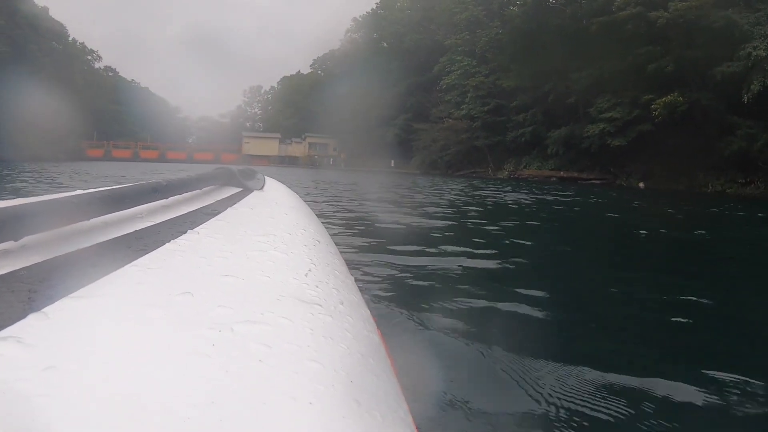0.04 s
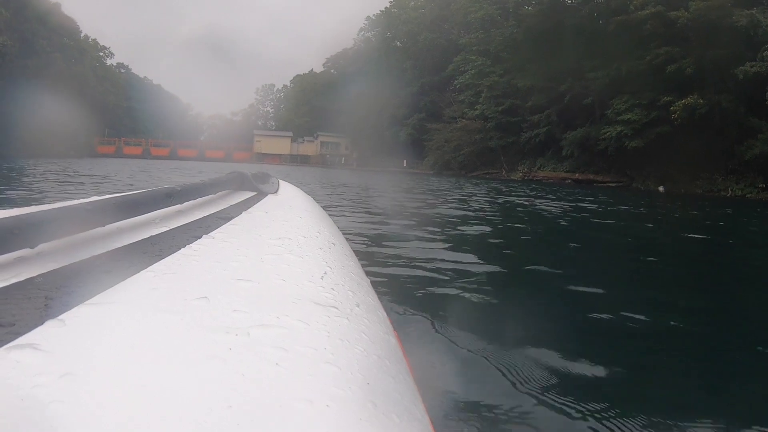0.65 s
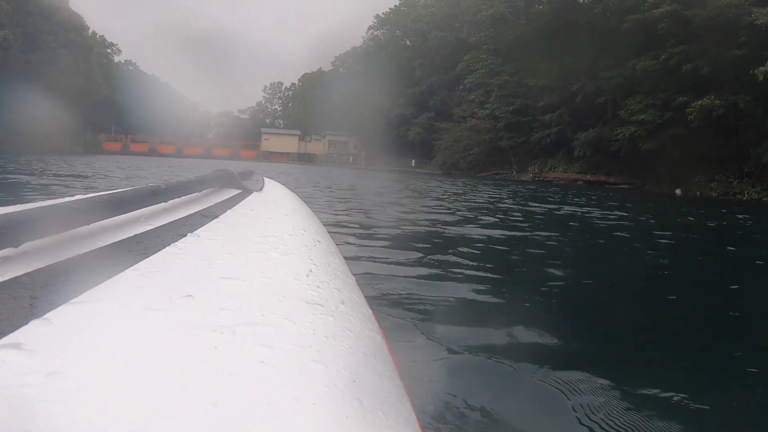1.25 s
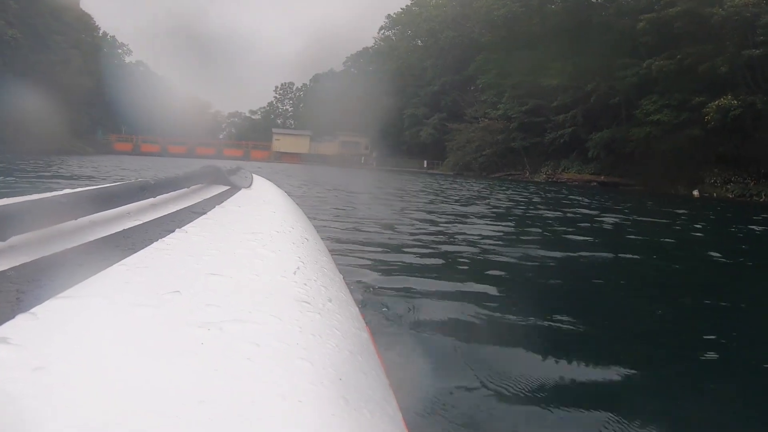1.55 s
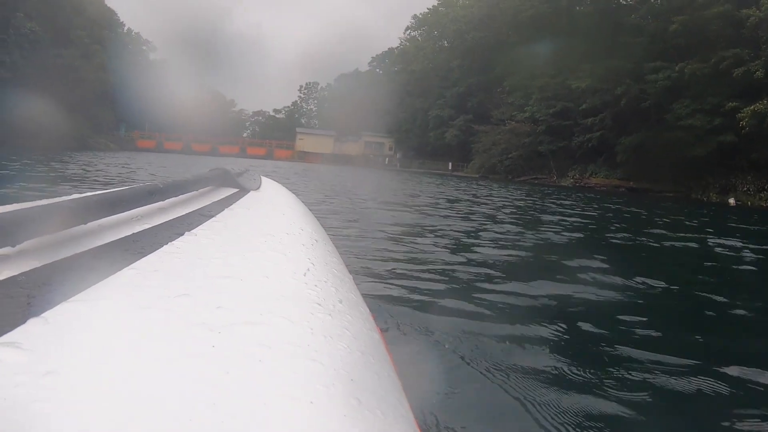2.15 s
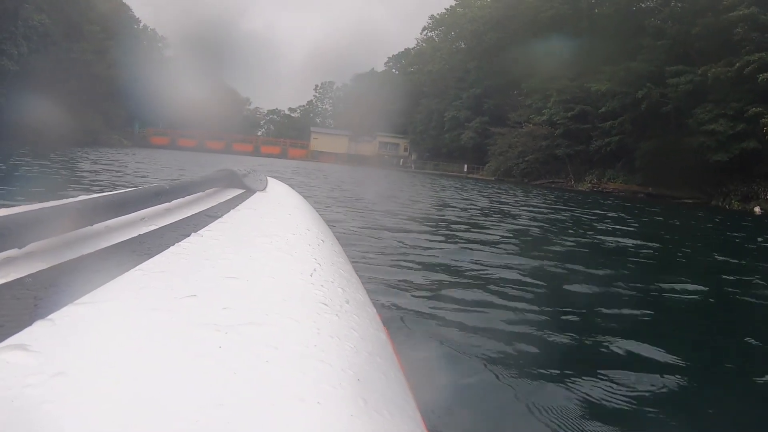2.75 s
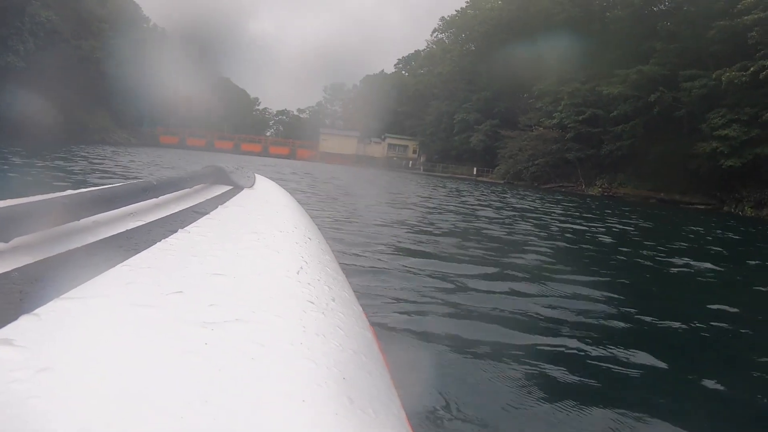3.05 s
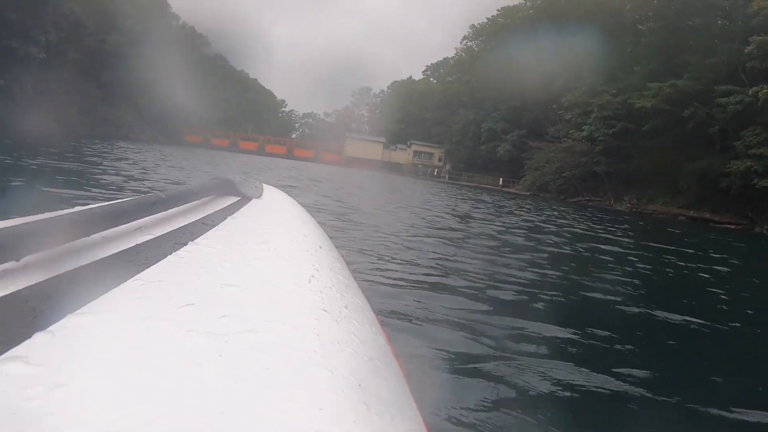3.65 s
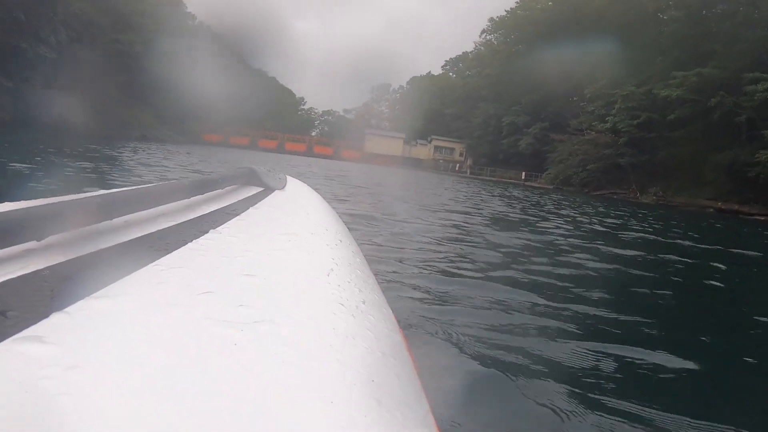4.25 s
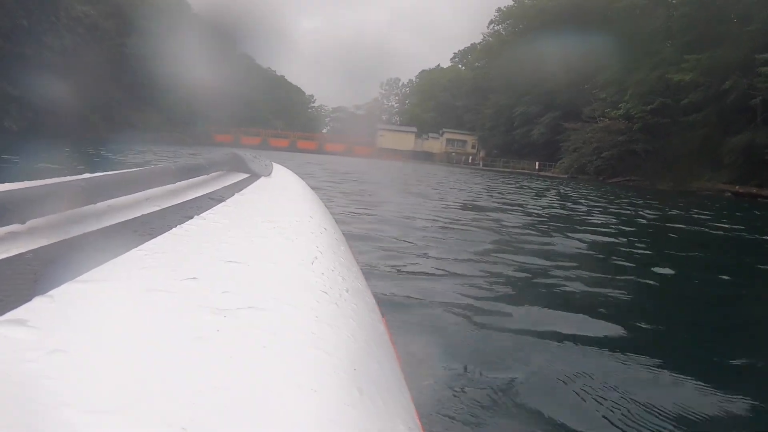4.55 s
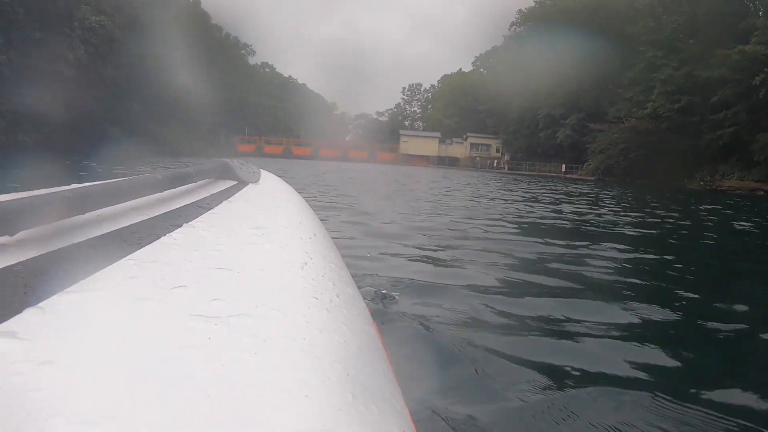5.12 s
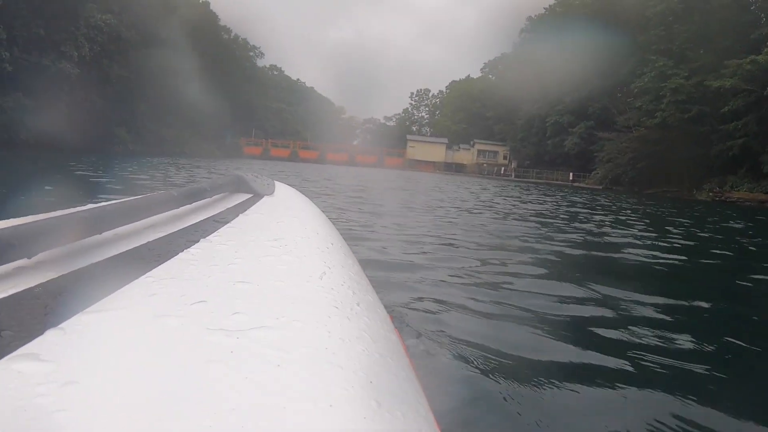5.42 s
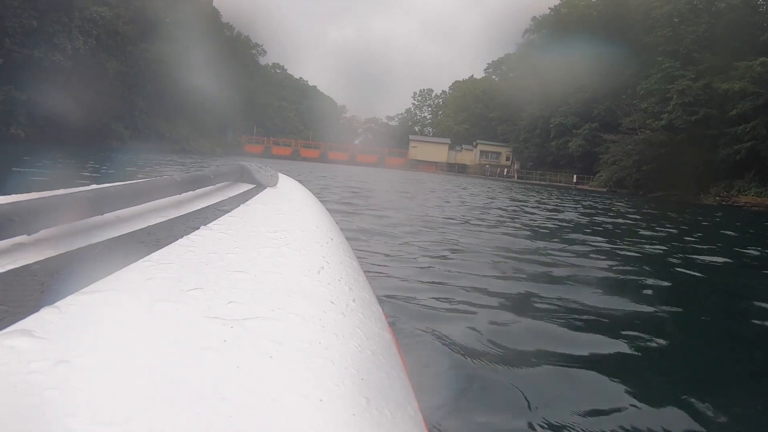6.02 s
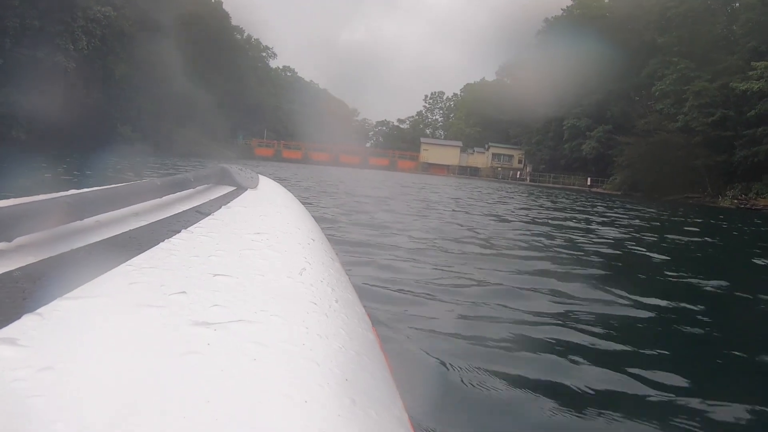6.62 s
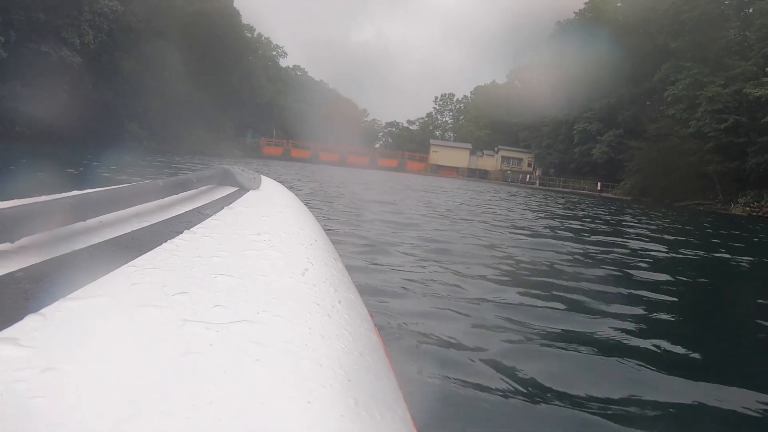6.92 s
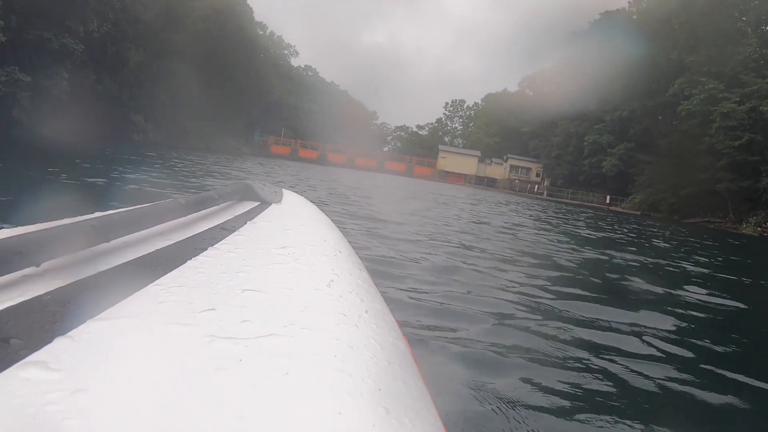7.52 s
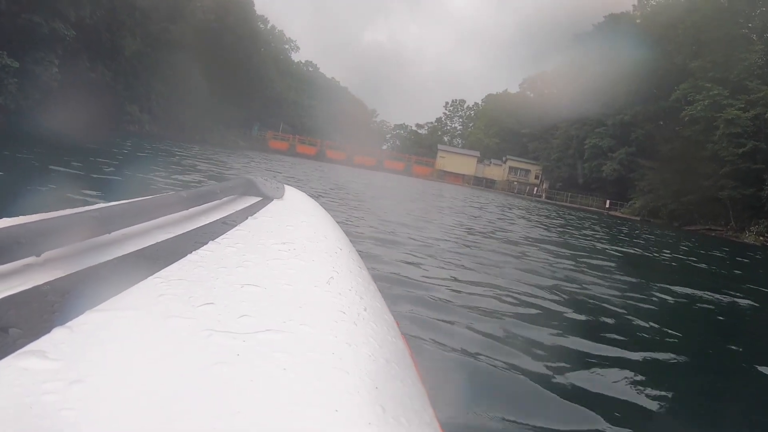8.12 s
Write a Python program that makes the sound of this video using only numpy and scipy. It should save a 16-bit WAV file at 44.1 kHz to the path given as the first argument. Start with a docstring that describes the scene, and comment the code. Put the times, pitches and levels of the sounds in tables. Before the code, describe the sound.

Close, irregular lapping and splashing against the nose of an inflatable board on a river, over the low, uneven boom of its hull. Bubbles plop and light rain patters on the deck throughout. A few small crests splash early on, then three paddle strokes slosh past amid harder bumps. A waterproof microphone on the deck gives the water a hollow, boxy tone.

```python
"""An inflatable paddleboard gliding up a river in light rain, its air-filled hull booming in the chop.
Wavelets slap air pockets under the nose and break into spray and bubbles. The paddle swishes past
three times; raindrops tick on the deck. Water and rain are heard through a small waterproof camera
on the deck: its case colours them and shifts the phase between its two ports."""
import sys
import numpy as np
from scipy import signal
from scipy.fft import rfft, irfft
from scipy.io import wavfile
from scipy.ndimage import uniform_filter1d

SR = 44100
rng = np.random.default_rng(int(sys.argv[2]) if len(sys.argv) > 2 else 0)


def int16_out(signal):
    """Quantize to a 16-bit WAV file."""
    q = np.round(np.clip(np.atleast_2d(signal).T, -1, 1) * 32767)
    wavfile.write(sys.argv[1], SR, q.astype(np.int16))


N = 369116
TIME_S = np.arange(N) / SR
BINS_HZ = np.fft.rfftfreq(N, 1 / SR)
SPLASH_RISE_S = 0.004

# Chop rocking the board: time_s, boom_db, skin_db
ROCKING = [(0.0, -26, -30.5), (0.45, -21.5, -37.5), (0.7, -36.5, -36), (1.3, -24, -30.5), (2.1, -27, -29.5),
           (2.7, -27, -32), (3.12, -29.5, -36), (3.5, -24, -33.5), (4.0, -22, -36.5), (4.16, -43, -37),
           (4.5, -26, -27.5), (5.45, -19, -29.5), (5.9, -27.5, -30), (6.72, -32.5, -39), (7.05, -20.5, -27),
           (7.75, -20.5, -39), (8.36, -26, -29)]
# Waves bumping the hull: peak_s, boom_db, skin_db
BUMPS = [(0.02, -17.5, -55), (0.264, -25, -21.5), (0.811, -18, -28), (1.598, -20, -25),
         (3.352, -12.5, -17.5), (3.978, -18, -23.5), (4.34, -13, -21), (4.793, -17.5, -25.5),
         (4.99, -15.5, -27), (5.35, -26, -16), (5.395, -21, -16.5), (6.233, -26, -20), (6.477, -16, -43),
         (6.882, -16.5, -22), (6.99, -37, -21), (7.162, -10.5, -40), (7.589, -16.5, -24),
         (8.088, -14.5, -17)]
# Wash of the gliding nose: time_s, churn_db, spray_db
NOSE_WASH = [(0.0, -34, -51.5), (0.6, -45.5, -55.5), (0.93, -40.5, -57.5), (1.5, -35, -47), (2.2, -40, -48),
             (3.0, -37.5, -55), (4.2, -40, -58), (4.85, -37.5, -51.5), (5.7, -40, -56), (6.1, -46.5, -51.5),
             (6.36, -48, -69), (6.65, -38.5, -59.5), (7.4, -41, -58.5), (7.7, -54, -81),
             (8.36, -43.5, -60.5)]
# Separate bubbles and drops against smooth swish: time_s, ratio_db
BREAKUP = [(3.0, 6.5), (3.6, 3), (4.4, 6.5), (5.2, 4.5), (6.6, 0.5), (7.4, 0)]
# Drops landing close by: start_s, peak_db
NEAR_DROPS = [(0.197, -21), (1.755, -20.5), (1.814, -16.5), (2.097, -14.5), (2.35, -11.5), (2.497, -20),
              (2.56, -16), (2.81, -19.5), (3.111, -20.5), (4.070, -19), (4.416, -13)]
# Splashes by the nose: breaking crests, and near 1.1-1.4 s the paddle's splashes: peak_s, slosh_db, spray_db,
# fade_s
SPLASHES = [(0.212, -33, -46, 0.19), (1.001, -39, -40.5, 0.033), (1.125, -21, -30, 0.067),
            (1.288, -26, -35, 0.13), (1.349, -26.5, -37.5, 0.11), (1.74, -31, -45, 0.11),
            (1.885, -30.5, -47.5, 0.081), (2.33, -43, -39, 0.037), (2.792, -26.5, -44, 0.035),
            (4.074, -50.5, -43, 0.13), (4.418, -31.5, -49.5, 0.13), (5.151, -24.5, -48, 0.052)]
# Single large bubbles: start_s, level_db, pitch_hz, ring_cycles
PLOPS = [(0.281, -19, 1940, 13), (0.326, -16.5, 3510, 4.5), (0.846, -20.5, 1845, 6),
         (0.99, -24.5, 1950, 6.8), (1.301, -10.5, 1920, 13), (1.755, -9, 3160, 2.2),
         (1.945, -16, 1440, 8.7), (2.351, -20, 1995, 6.4), (2.56, -4, 1574, 5.4), (2.562, -12.5, 840, 3.2),
         (2.821, -2, 1670, 3.1), (2.826, -6.5, 1976, 10.7), (2.848, -21, 1235, 15),
         (3.343, -20.5, 1240, 8.6), (3.412, -23, 3680, 15), (3.962, -13, 1744, 8.3), (4.4, -18, 1320, 2),
         (4.426, -12.5, 2800, 3.9), (4.457, -12.5, 1720, 11), (4.471, -19.5, 2120, 30),
         (4.641, -4.5, 1145, 3.3), (4.745, -17, 3070, 4.5), (5.157, -15.5, 1350, 6.6),
         (5.181, -16, 1380, 5.9), (5.269, -29, 2720, 14), (5.425, -14, 2190, 4.8), (5.834, -15, 1760, 1.9),
         (6.207, -16, 1440, 1.54), (6.293, -22.5, 1900, 9.3), (6.352, -9, 1427, 15.4), (6.564, -20, 994, 6),
         (6.717, -22.5, 1425, 10), (6.771, -18.5, 1860, 19), (6.878, -20, 2130, 5.6),
         (7.027, -20.5, 3010, 14), (7.178, -15.5, 1430, 2.1)]
# Wavelets closing on air pockets: time_s, clop_db, thud_db
SLAPS = [(0.476, -26, -30.5), (0.758, -18, -22), (0.982, -16, -26), (1.137, -24.5, -20),
         (1.393, -24.5, -25.5), (1.826, -18, -19.5), (2.172, -16.5, -27), (2.524, -20, -28),
         (2.788, -11.5, -47), (3.205, -15, -21.5), (3.3, -9.5, -11.5), (3.544, -14, -25.5),
         (3.815, -16.5, -34), (3.965, -15.5, -39), (4.692, -15, -24), (5.088, -17.5, -27),
         (5.468, -9.5, -32), (5.488, -10, -17.5), (5.699, -20, -27), (6.197, -9.5, -30.5),
         (6.975, -21, -32), (7.105, -18, -23), (7.522, -7.5, -17.5), (7.835, -29.5, -28.5)]
# Paddle strokes: start_s, length_s, slosh_db, final_spray_db
STROKES = [(3.154, 0.77, -38.5, -39.5), (4.948, 0.55, -36, -50), (6.807, 0.446, -36.5, -42.5)]

# Case resonances: centre_hz, width_hz, left_db, right_db
CASE_MODES = [(572, 201, 14, 2), (747, 117, 9.5, 11), (1415, 252, 13.5, 14.5), (1930, 80, 7.5, 4.5),
              (2345, 1360, 4, 10), (3036, 153, 7.5, 3.5), (3580, 345, 5, 5.5), (4990, 1060, -0.5, 4.5),
              (8270, 990, -1.5, 6.5)]
# Phase between the ports: freq_hz, left_lead_rad
PORT_PHASE = [(280, -1), (430, -4.5), (730, -4), (840, -2), (1100, -1), (1700, -3), (2030, -7.5),
              (2600, -2.5), (3650, -7), (4600, -2.5), (6500, -3), (8500, -5.5)]
# Source spectra: freq_hz, gain_db
BOOM_SPECTRUM = [(10, -28), (25, -14), (43, 1), (53, -6), (66, -10), (1000, -160)]
SKIN_SPECTRUM = [(55, -9.5), (90, -8), (128, 2), (180, -12), (220, -8), (290, -23.5), (2000, -130)]
CHURN_SPECTRUM = [(150, -61), (330, 14.5), (480, 3.5), (1000, -2), (2100, -3.5), (2800, -10), (4200, -10),
                  (6000, -18), (9000, -68.5), (13000, -100)]
SPRAY_SPECTRUM = [(1500, -6.5), (3500, -0.5), (5000, -0.5), (6500, -2), (9600, -8.5), (10900, -21.5),
                  (13000, -25), (15500, -52)]
SLOSH_SPECTRUM = [(150, -49.5), (400, -6), (1150, 4.5), (2100, 0.5), (4400, -7.5), (11000, -83)]
SNAP_SPECTRUM = [(2500, 3), (9000, -12), (11500, -31), (15000, -56)]


def amp(db):
    return 10 ** (np.asarray(db) / 20)


def unit_rms(x):
    return x / np.sqrt(np.mean(x ** 2) + 1e-20)


def unit_stereo(pair):
    """Scales so that the rms of the two channels' peaks is one."""
    return pair / np.sqrt(np.mean(abs(pair).max(1) ** 2))


def power_sum(gains):
    return np.sqrt(sum(gain ** 2 for gain in gains))


def at_hz(table, hz):
    """Table lookup on a log-frequency axis."""
    freq_hz, value = np.transpose(table)
    return np.interp(np.log(hz + 1), np.log(freq_hz + 1), value)


def gain_curve(table, column):
    """A dB column of a time table as gain per sample."""
    rows = np.array(table)
    return amp(np.interp(TIME_S, rows[:, 0], rows[:, column]))


def add(mix, start_s, sound):
    part = mix[:, max(round(start_s * SR), 0):][:, :sound.shape[1]]
    part += sound[:, :part.shape[1]]


def slow_noise(cutoff_hz):
    return unit_rms(irfft(rfft(rng.standard_normal(N)) / (1 + (BINS_HZ / cutoff_hz) ** 4), N))


def impacts(per_s, spread_db, limit=2.9):
    """Random impulses: many small, few large."""
    sizes = amp(spread_db * np.minimum(rng.exponential(1, N), limit))
    return sizes * rng.choice([-1, 1], N) * (rng.random(N) < per_s / SR)


def stereo(x, width):
    """Decorrelates the ports with reversed, shifted copies."""
    return x + width * np.array([np.roll(x[::-1], k * SR) for k in (1, 2)])


def through_case(x, spectrum, size=4096, delay=512):
    """Applies source spectrum, case resonances and port phase."""
    hz = np.fft.rfftfreq(size, 1 / SR)
    case_db = sum(np.array([[left_db], [right_db]]) / (1 + (2 * (hz - centre_hz) / width_hz) ** 2)
                  for centre_hz, width_hz, left_db, right_db in CASE_MODES)
    db = case_db + at_hz(spectrum, hz)
    log_gain = np.log(amp(db.mean(0)))
    min_phase = -signal.hilbert(np.r_[log_gain, log_gain[-2:0:-1]]).imag[:len(hz)]
    phase = min_phase - np.outer([0, 1], at_hz(PORT_PHASE, hz))
    taps = np.roll(irfft(amp(db) * np.exp(1j * phase)), delay, 1)
    return signal.oaconvolve(np.atleast_2d(x), taps, axes=1)[:, delay:delay + x.shape[-1]]


def swell(peak_s, rise_s, fade_s):
    """Linear rise, exponential decay."""
    age_s = TIME_S - peak_s
    return np.clip(1 + age_s / rise_s, 0, 1) * np.exp(-np.clip(age_s / fade_s, 0, 20))


def sway(spectrum, width, steady_s):
    """Random resonant hull motion, levelled over steady_s."""
    common, left, right = irfft(rfft(rng.standard_normal((3, N))) * amp(at_hz(spectrum, BINS_HZ)), N)
    pair = common + width * np.array([left, right])
    power = (abs(signal.hilbert(pair)) ** 2).mean(0) / 2
    return pair / np.sqrt(uniform_filter1d(power, int(steady_s * SR)) + 1e-20)


def thumps(pitch_hz, rise_s, fade_s, column, waver=0.1086):
    """Bumps ring one hull mode; water loading wavers its pitch."""
    strength = power_sum(amp(bump[column]) * swell(bump[0], rise_s, fade_s) for bump in BUMPS)
    loaded_hz = pitch_hz * (1 + waver * slow_noise(pitch_hz / 2))
    return strength * np.sqrt(2) * np.sin(2 * np.pi * np.cumsum(loaded_hz) / SR)


def hull():
    """The whole board booms; its tight skin drums higher and responds sooner."""
    boom = sway(BOOM_SPECTRUM, width=0.19, steady_s=0.22) * gain_curve(ROCKING, column=1)
    boom += thumps(pitch_hz=42.3, rise_s=0.04, fade_s=0.064, column=1)
    skin = sway(SKIN_SPECTRUM, width=0.8, steady_s=0.12) * gain_curve(ROCKING, column=2)
    skin *= unit_rms(amp(3.5 * slow_noise(11)))
    skin += thumps(pitch_hz=127, rise_s=0.017, fade_s=0.027, column=2)
    return boom * amp([[3.3], [-2.3]]) + skin * amp([[1], [-1]])


def bubble(pitch_hz, ring_cycles, rise, onset_cycles, quiver, size=2600):
    """Trapped air quivers and rings down; pitch climbs toward the surface."""
    cycles = pitch_hz * TIME_S[:size]
    age = cycles / ring_cycles
    bend = 1 + rise * (np.minimum(age, 2) - .5) + quiver * rng.standard_normal(size)
    onset = 1 - np.exp(-(cycles / onset_cycles) ** 2)
    return np.sin(2 * np.pi * np.cumsum(pitch_hz * bend) / SR) * np.exp(-2 * age) * onset


def bubble_cloud(per_s, spread_db, ring_cycles=9):
    """Short-lived bubbles: few large and low, many small and high."""
    out, pitches_hz = np.zeros(N), np.geomspace(520, 5000, 48)
    for hz in pitches_hz:
        ring = bubble(hz, ring_cycles * (.5 + rng.random()), rise=0.04, onset_cycles=1, quiver=0.1)
        births = impacts(per_s * hz / pitches_hz.sum(), spread_db, limit=2.3)
        out += signal.oaconvolve(births, unit_rms(ring))[:N]
    return out


def texture(x, spectrum, width):
    """Mono source to unit-rms stereo through the case."""
    return unit_rms(through_case(stereo(x, width), spectrum))


def blend(grains, swish):
    """Constant-power mix set by BREAKUP."""
    ratio = gain_curve(BREAKUP, column=1)
    return (ratio * grains + swish) / np.sqrt((ratio ** 2 + 1) / 2)


def churn(surge, surge_db=3.0):
    """Water curls past the nose: small bubbles over surging foam."""
    bubbles = texture(bubble_cloud(per_s=200, spread_db=9), CHURN_SPECTRUM, width=0.54)
    foam = texture(rng.standard_normal(N), CHURN_SPECTRUM, width=0.87)
    return gain_curve(NOSE_WASH, column=1) * blend(bubbles, foam * amp(surge_db * surge))


def spray(strength, surge, surge_db=3.5):
    """Droplets fall back as crackling fizz, over the faint hiss of rain on the river."""
    drops = amp(-1.5) * texture(impacts(per_s=450, spread_db=2), SPRAY_SPECTRUM, width=1)
    mist = amp(-2.5) * texture(rng.standard_normal(N), SPRAY_SPECTRUM, width=0.94)
    far_rain = amp(-65) * mist[:, ::-1]
    return strength * amp(surge_db * surge) * blend(drops, mist) + far_rain


def slosh(strength, gurgle_db=2.5, river_db=-55):
    """Water shoved by a crest or the blade gurgles over the river's soft wash."""
    bubbles = texture(bubble_cloud(per_s=520, spread_db=3), SLOSH_SPECTRUM, width=0.89)
    gurgle = amp(gurgle_db * slow_noise(28))
    return bubbles * power_sum([strength * gurgle, amp(river_db)])


def splat(mean_fade_s=0.0014, size=1200):
    """One drop bursts on the wet deck."""
    noise = stereo(rng.standard_normal(size), width=1)
    return noise * np.exp(-TIME_S[:size] / (mean_fade_s * (.5 + rng.random())))


def rain(spray_gain, per_s=32, patter_db=-46.5, spots=8):
    """Drops patter on deck spots of differing colour, louder with spray; a few tick close by."""
    patter = np.zeros((2, N))
    for _ in range(spots):
        hits = impacts(per_s / spots, spread_db=6.5)
        patter += signal.oaconvolve(hits[None], splat(), axes=1)[:, :N]
    patter *= np.sqrt(spray_gain) * gain_curve(BREAKUP, column=1)
    out = amp(patter_db) * unit_rms(through_case(patter, SPRAY_SPECTRUM))
    for start_s, peak_db in NEAR_DROPS:
        tick = through_case(splat(), SPRAY_SPECTRUM)
        add(out, start_s, amp(peak_db) * tick / abs(tick).max())
    return out


def splash_gains():
    """Slosh and spray gains: each splash spills fast, pours briefly, runs out."""
    sloshes, sprays = [], []
    for peak_s, slosh_db, spray_db, fade_s in SPLASHES:
        age_s = TIME_S - peak_s
        spill = np.clip(1 + age_s / SPLASH_RISE_S, 0, 1) * np.exp(-np.clip(age_s / fade_s, 0, 10) ** 2)
        sloshes.append(amp(slosh_db) * spill)
        sprays.append(amp(spray_db) * spill)
    return power_sum(sloshes), power_sum(sprays)


def splash_smacks(gain_db=8, fade_s=0.022, hardness=1.67):
    """Splash fronts hit the water with a bright smack, big ones far harder."""
    strength = power_sum(amp(gain_db + hardness * slosh_db) * swell(peak_s, SPLASH_RISE_S, fade_s)
                         for peak_s, slosh_db, _, _ in SPLASHES)
    return strength * texture(rng.standard_normal(N), SNAP_SPECTRUM, width=1)


def plops(gain_db=2, snap_s=0.0038, attack_s=0.00015):
    """Large bubbles pinch off with a tiny snap and ring briefly."""
    out = np.zeros((2, N))
    for start_s, level_db, pitch_hz, ring_cycles in PLOPS:
        ring = bubble(pitch_hz, ring_cycles, rise=0.011, onset_cycles=2.85, quiver=0.32)
        t = TIME_S[:len(ring)]
        snap = 0.041 * rng.standard_normal(len(t)) * np.exp(-t / snap_s)
        plop = through_case(ring + snap, SNAP_SPECTRUM) * (1 - np.exp(-(t / attack_s) ** 2))
        add(out, start_s, amp(level_db + gain_db) * unit_stereo(plop))
    return out


def clop(pocket_hz, shake, ring_s=0.013, smack_s=0.011, onset_s=0.005):
    """An air pocket rings hollow in two sagging modes, with a wet smack."""
    t = TIME_S[:len(shake)]
    decay = np.exp(-t / ring_s)
    sag = 1 + 0.21 * (decay - .5) + 0.095 * shake
    phase = 2 * np.pi * np.cumsum(pocket_hz * sag) / SR
    modes = np.sin(phase) + amp(-5) * np.sin(1.29 * phase)
    ring = modes * (1 + 0.3 * shake[::-1]) * decay
    smack = 0.6 * stereo(rng.standard_normal(len(t)), width=0.99) * np.exp(-t / smack_s)
    onset = 1 - np.exp(-t / onset_s)
    return unit_stereo(through_case((ring + smack) * onset, CHURN_SPECTRUM))


def thud(pocket_hz, shake, end_hz=105, max_fall_s=0.017, peak_s=0.036):
    """The pocket spreads under the hull; its pitch drops into a thud of the skin."""
    t = TIME_S[:len(shake)]
    fall_s = max_fall_s * (1 - .5 * rng.random())
    glide_hz = end_hz + (pocket_hz - end_hz) * np.exp(-t / fall_s)
    phase = 2 * np.pi * np.cumsum(glide_hz * (1 + 0.379 * shake)) / SR
    envelope = (t / peak_s * np.exp(1 - t / peak_s)) ** 7
    return np.sin(phase) * envelope * amp([[1], [-1]])


def slaps(clop_gain_db=3, thud_gain_db=2, lead_s=0.00303, lap_count=44, size=6000):
    """Wavelets trap air: clop, then thud. Small laps between them follow the nose wash in level."""
    out = np.zeros((2, N))
    wobble = slow_noise(375)
    laps_s = (np.arange(lap_count) + rng.random(lap_count)) / lap_count * N / SR
    wash_db = np.interp(laps_s, *np.transpose(NOSE_WASH)[:2])
    laps_db = .5 * wash_db - 4 - 6 * rng.random(lap_count)
    laps = [(time_s, db, db - 14) for time_s, db in zip(laps_s, laps_db)]
    for time_s, clop_db, thud_db in SLAPS + laps:
        shake = np.roll(wobble, -round(time_s * SR))[:size]
        pocket_hz = 530 - 4 * clop_db  # harder slap, larger pocket, lower pitch
        add(out, time_s - lead_s, amp(clop_db + clop_gain_db) * clop(pocket_hz, shake))
        add(out, time_s, amp(thud_db + thud_gain_db) * thud(pocket_hz, shake))
    return out


def paddle_gains(catch_s=0.013, release_s=0.045, spray_db_per_s=32.5):
    """Slosh and spray gains: the blade digs in, throws ever more spray, lifts out."""
    sloshes, sprays = [], []
    for start_s, length_s, slosh_db, final_spray_db in STROKES:
        age_s = TIME_S - start_s
        pull = np.clip(age_s / catch_s, 0, 1) * np.exp(-np.clip((age_s - length_s) / release_s, 0, 20))
        remaining_s = np.maximum(length_s - age_s, 0)
        sloshes.append(amp(slosh_db) * pull)
        sprays.append(amp(final_spray_db - spray_db_per_s * remaining_s) * pull)
    return power_sum(sloshes), power_sum(sprays)


def scene():
    """Hull, water and rain; splashes and paddle strokes both drive slosh and spray."""
    surge = slow_noise(19)
    splash_slosh, splash_spray = splash_gains()
    paddle_slosh, paddle_spray = paddle_gains()
    slosh_gain = power_sum([splash_slosh, paddle_slosh])
    spray_gain = power_sum([gain_curve(NOSE_WASH, column=2), splash_spray, paddle_spray])
    water = churn(surge) + slosh(slosh_gain) + spray(spray_gain, surge) + splash_smacks()
    return hull() + slaps() + plops() + water + rain(spray_gain)


def record(dry, cutoff_hz=15600):
    """Band limit."""
    lowpass = signal.firwin(511, cutoff_hz, window=("kaiser", 9), fs=SR)
    return signal.oaconvolve(dry, lowpass[None], "same")


dry = scene()
out = record(dry)
int16_out(out)
```